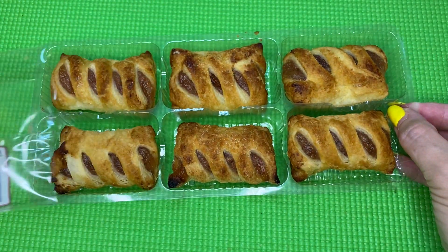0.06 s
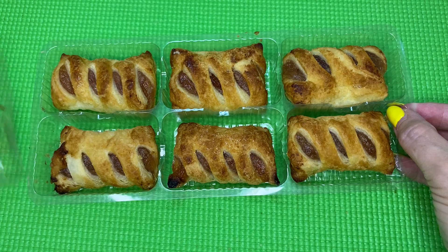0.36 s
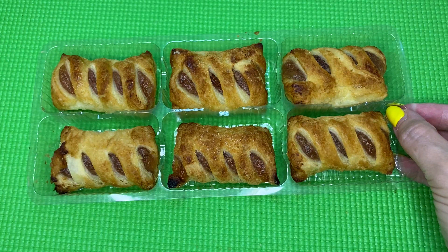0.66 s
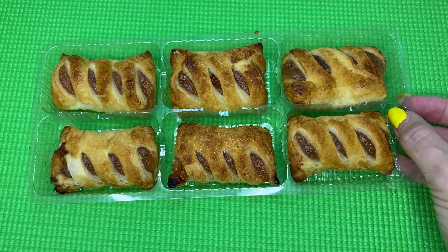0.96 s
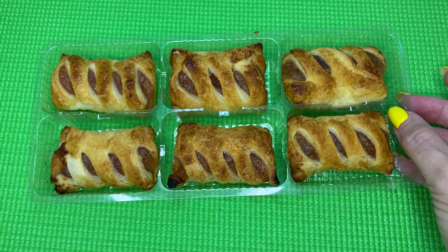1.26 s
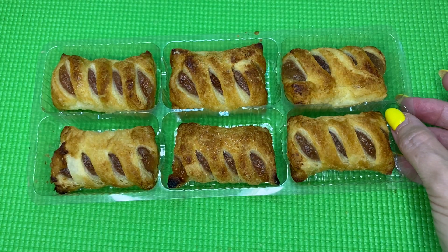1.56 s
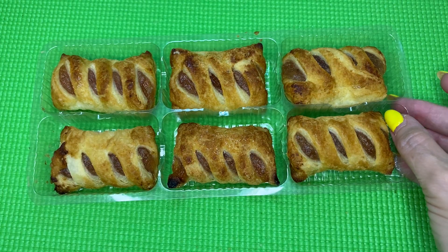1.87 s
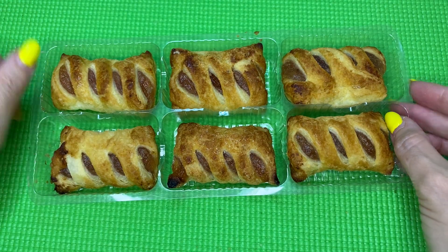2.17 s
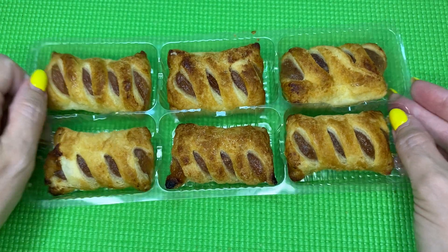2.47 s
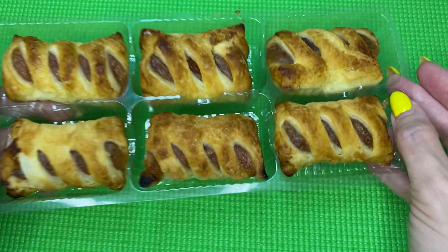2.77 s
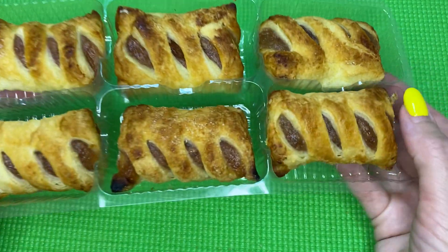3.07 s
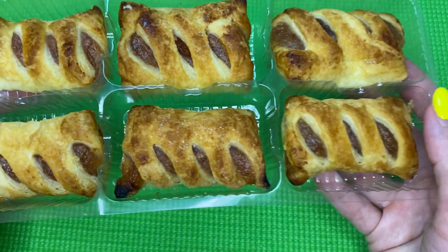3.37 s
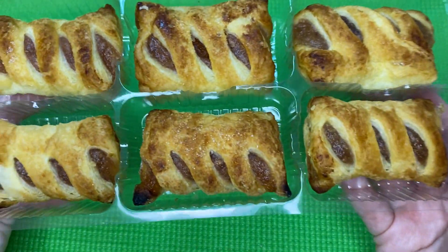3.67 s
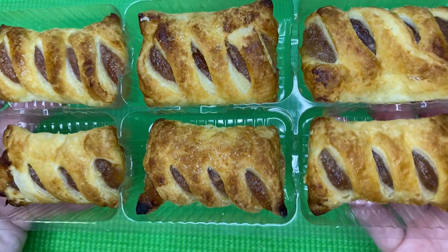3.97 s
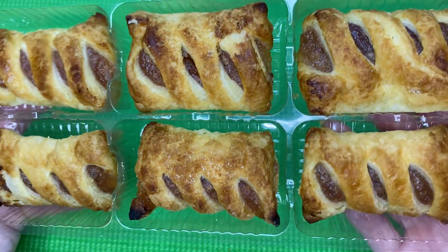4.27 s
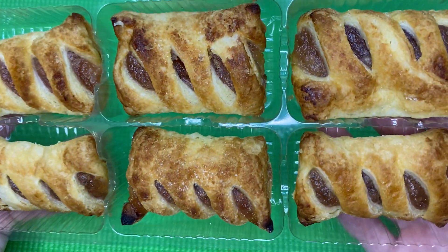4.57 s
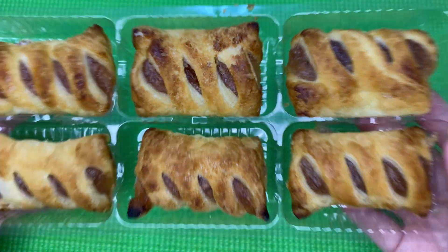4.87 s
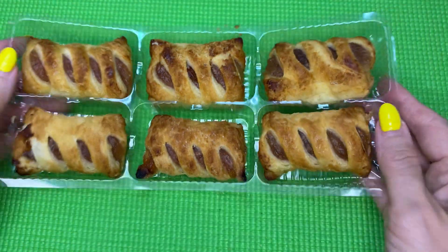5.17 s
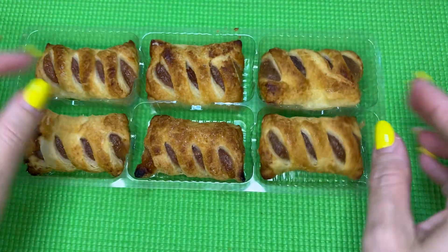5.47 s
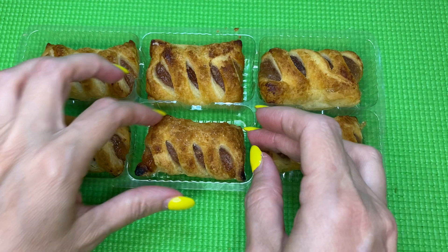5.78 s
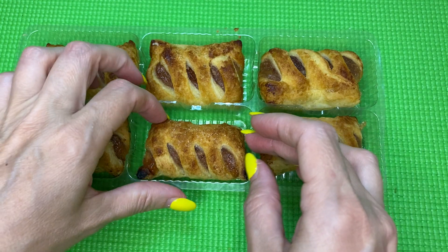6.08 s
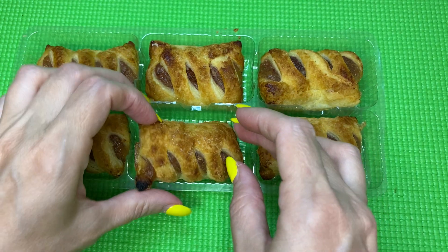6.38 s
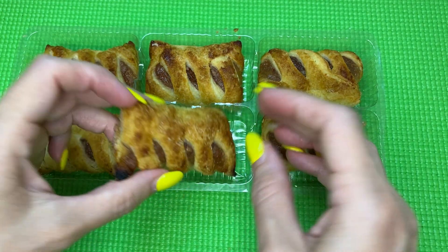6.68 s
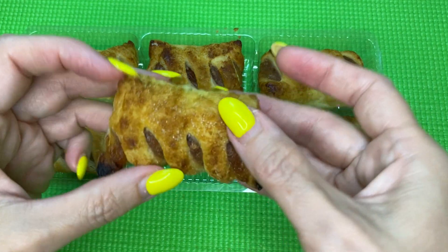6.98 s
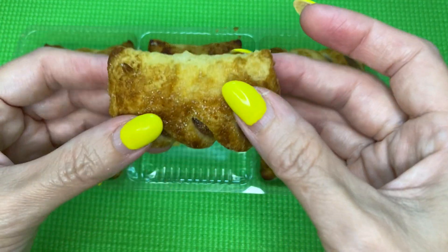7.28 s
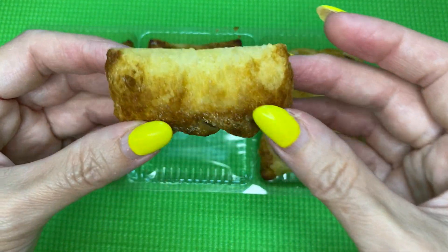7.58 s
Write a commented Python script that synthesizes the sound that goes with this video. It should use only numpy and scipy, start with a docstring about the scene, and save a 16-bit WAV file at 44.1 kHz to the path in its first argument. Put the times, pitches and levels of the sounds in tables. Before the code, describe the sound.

Thin plastic film crackles off to one side as it is pulled away. Close to the microphone, hands lift a plastic tray of pastries, its ribs snapping sharply and its walls buckling with hollow pops while skin rubs on the plastic. The tray lands on a mat with a soft thump, then a few light clicks and very faint ticks of dry crust follow. The small room hums faintly.

```python
"""A small, faintly humming room, one microphone close to a plastic tray of pastries on a soft mat.
Off to one side, thin film is drawn off and put aside, crackling as its creases flip over. Hands lift
the tray, whose ribs snap sharply and whose walls buckle with hollow pops, set it down with a thump
and pick out a pastry, its dry crust ticking. Skin and plastic rub between the snaps; a near wall
and the room answer each one."""
import sys
import numpy as np
from scipy import signal
from scipy.fft import rfft, irfft, next_fast_len
from scipy.io import wavfile
from scipy.ndimage import uniform_filter1d, map_coordinates

SR = 44100
rng = np.random.default_rng(int(sys.argv[2]) if len(sys.argv) > 2 else 0)


def dump(signal):
    """Clip the signal to [-1, 1] and save it as 16-bit WAV at the path in sys.argv[1]."""
    limited = np.clip(np.atleast_2d(signal).T, -1, 1)
    pcm = np.round(limited * 32767).astype(np.int16)
    wavfile.write(sys.argv[1], SR, pcm)


N = 341334

# Levels are relative, ahead of the mix. Sharpness, fizz and thud are levels over the panel's.
# Ribs and corners of the tray snapping, close to the microphone:
# (time [s], panel level [dB], panel pitch [Hz], sharpness [dB], fizz [dB], thud [dB])
RIB_SNAPS = [(2.3422, -27.5, 1450, 0.5, -9, -10), (2.4277, -26, 2204, 4, -3, -27),
             (2.4773, -29, 1480, -3, -18, -18), (2.54, -34, 2000, 4.5, 4, -23.5),
             (2.5505, -27.5, 1834, 2.5, 2, -13.5), (2.6397, -23.5, 1860, -7, -13.5, -34.5),
             (2.7859, -33.5, 1570, 7.5, 11, -14), (2.8295, -54, 1510, 13, 17, 3.5),
             (2.9103, -32.5, 1629, 1, -8.5, -6), (3.0526, -49, 1080, 2.5, -13, -9),
             (3.2057, -31.5, 1330, 2.5, -15, -4), (3.222, -34.5, 2400, -6, -29, -20),
             (3.2542, -37, 1622, 15, 1, 0.5), (3.2991, -38.5, 1344, 17, 10.5, -0.5),
             (3.301, -30.5, 1100, 6.5, 3.5, -0.5), (3.396, -45.5, 1280, 6, -17, -14),
             (4.4214, -60.5, 1150, -1.5, -9, -7.5), (4.8941, -25.5, 1390, .5, -6, -11),
             (5.1922, -22, 1543, 0, 1, -11), (5.2312, -37.5, 1346, -4.5, -13.5, -11.5),
             (5.3907, -33, 1505, .5, -14, -9.5), (5.4089, -48, 1120, 12, -2, -9),
             (5.4247, -49, 1840, 13, 10, -22), (5.4304, -49.5, 1400, 13, 14, -14),
             (5.4383, -39.5, 1330, 1, -5, -7), (5.4437, -37, 1440, -2, -8, -4.5),
             (5.503, -51.5, 1340, -2, 4, -5), (5.8687, -51, 3180, -4, -3.5, -12),
             (6.0106, -57.5, 1400, -7, -24, -2), (6.0595, -65, 1500, -0.5, 0, -13),
             (6.36, -65.5, 1500, 4, 2, -15), (6.2161, -63.5, 1520, 8, 0.5, 0),
             (6.4388, -55, 1160, 5.5, -15, -6)]
# Broad walls of the tray popping: (time [s], panel level [dB], panel pitch [Hz], thud [dB])
WALL_POPS = [(2.2935, -50.5, 1400, -10), (2.3282, -46.5, 1270, -5), (2.817, -37, 1150, -18),
             (2.8334, -30, 1250, -29), (2.8491, -28, 1470, -9.5), (2.8598, -28.5, 1632, -9),
             (2.8644, -28.5, 1220, -25), (2.8845, -30.5, 1250, -7), (2.9124, -31, 1183, -5.5),
             (2.9432, -31, 1320, -17), (3.0408, -31.5, 1046, -16.5), (3.4584, -30, 905, -17),
             (3.4688, -31, 1245, -14), (3.474, -39, 950, -3), (3.4842, -49, 1150, -10),
             (3.6179, -48.5, 1090, -7), (3.8752, -49, 830, -1), (3.9409, -46.5, 940, -7.5),
             (4.1392, -52, 1010, 2), (4.357, -57, 877, 0.5), (4.7653, -43.5, 810, -9.5),
             (4.777, -53, 800, -0.5), (4.8385, -46, 990, -6.5), (5.077, -32, 1330, -24),
             (5.1839, -37.5, 1500, -11)]
# Standing waves of the tray: (frequency [Hz], width [Hz], level against the plain response [dB])
TRAY_RESONANCES = [(600, 27, -3.5), (758, 32, -4), (1214.4, 9.6, -5), (1400, 30, -10), (2516, 570, -6),
                   (3120, 130, -6), (4600, 38, -4.5), (4950, 29, -4.5), (5950, 220, -6.5), (8660, 160, -9),
                   (9680, 160, -4), (12400, 160, -5), (12400, 210, -5)]
# Creases of the film flipping over, off to one side:
# (time [s], panel level [dB], panel pitch [Hz], sharpness [dB], fizz [dB])
FILM_CREASES = [(.082, -44, 2010, -5.5, -16), (.1358, -45, 1410, -1, -3.5), (.1589, -41, 2040, 0, -7),
                (.1855, -51, 1870, 2, 4), (.2079, -36, 1560, 0.5, 4.5), (.2183, -53, 1700, 3, 2),
                (.2298, -42.5, 1870, 1, -2), (.2327, -50.5, 1600, 8.5, 0), (.285, -42, 1680, 3, 5),
                (.2927, -39, 1470, -1, 0), (.4632, -40, 1750, -1, -6), (.4815, -45, 1500, -2.5, -17),
                (.5052, -50, 1240, -2, -8), (.5601, -56, 1600, 1, -7), (.6258, -36.5, 1840, -1, -10),
                (.6526, -44, 1070, -2.5, -11), (.7303, -57.5, 950, 0, -3), (.752, -47, 1500, 7.5, 4),
                (.8002, -57.5, 900, 1, -12), (.8881, -58.5, 1500, 6, -2), (.9078, -56.5, 990, 2, -6),
                (.9844, -52, 1600, -3.5, -23), (1.1236, -54, 1000, -10, -14),
                (1.288, -56.5, 1100, -2.5, -12), (1.3119, -56, 1150, -16, -20.5),
                (1.3618, -43.5, 1480, -3, -12.5), (1.3825, -39, 1500, 1.5, -2),
                (1.4059, -36.5, 1300, 0, 4.5), (1.4185, -34.5, 1600, 3.5, 6), (1.461, -35, 1250, 4, 5),
                (1.4895, -46, 1300, -5, -4), (1.5979, -54.5, 1100, -3, -7), (1.6458, -53.5, 1200, -15, -30),
                (1.7897, -49.5, 1700, 11, 9.5), (1.9562, -49.5, 1110, -17, 1)]
# Standing wave of the film: (frequency [Hz], width [Hz], level against the plain response [dB])
FILM_RESONANCES = [(1590, 71, -16)]
# Film and skin sliding over plastic and pastry: (start [s], length [s], scrape [dB], hiss [dB])
RUB_STROKES = [(.01, .13, -61, -54), (0.153, .15, -54.5, -46.5), (0.48, 0.05, -52, -68),
               (0.584, 0.29, -65, -70.5), (0.983, 0.16, -67, -66.5), (1.109, 0.21, -62.5, -62),
               (1.379, 0.13, -47, -60), (1.42, .03, -52, -46), (1.818, 0.059, -62.5, -61.5),
               (1.934, 0.028, -50.5, -52), (1.985, 0.14, -71, -66), (2.252, 0.086, -61.5, -54),
               (2.367, 0.37, -54.5, -52.5), (2.559, 0.055, -49, -43.5), (2.79, 0.083, -45.5, -45),
               (2.851, 0.043, -38.5, -53), (2.962, .13, -63.5, -60), (3.151, 0.082, -47.5, -49.5),
               (3.285, 0.055, -61, -43), (3.382, .08, -60.5, -55.5), (3.458, 0.046, -50, -46),
               (3.618, 0.23, -59.5, -54.5), (3.921, 0.077, -61.5, -60), (4.139, 0.006, -52.5, -54),
               (4.337, 0.16, -67.5, -68), (4.831, 0.076, -57.5, -48), (4.982, 0.351, -58.5, -46),
               (5.2, 0.062, -49, -48), (5.398, 0.032, -41, -33), (5.455, 0.095, -50, -55),
               (5.818, .035, -64, -57.5), (5.919, 0.04, -65, -57.5), (6.084, 0.059, -62, -58),
               (6.24, 0.02, -52, -48.5), (6.375, 0.11, -64, -61), (6.548, 0.062, -75, -59),
               (6.632, 0.018, -67, -53), (6.722, 0.041, -88, -70.5), (7.002, .13, -80.5, -71.5),
               (7.301, 0.13, -80, -73), (7.502, .1, -87, -69)]
# The contact catching, loose film more than fingers: (time [s], level against the sliding [dB])
CATCH_LEVELS = [(0, -4.5), (2.3, -1.5), (2.5, -15), (5.35, -16), (5.5, -7.5), (7.74, -11)]
# Thin walls scraping: (frequency [Hz], level [dB])
SCRAPE_SPECTRUM = [(30, -61), (100, -23), (250, -7), (400, -5), (580, -1), (850, -2), (1200, -3),
                   (2000, -10.5), (3200, -11.5), (8000, -36)]
# The rubbed surface hissing: (frequency [Hz], level [dB])
HISS_SPECTRUM = [(40, -58), (900, -25.5), (2000, -6.5), (2900, -4), (4400, -1.5), (6800, -4), (9500, -5.5),
                 (12600, -5), (14500, -12.5), (16000, -23.5)]
# The tray knocking and dropping onto the mat: (time [s], level [dB], pitch [Hz])
MAT_THUMPS = [(.725, -52, 200), (0.804, -51, 134), (.81, -51.5, 368), (1.18, -54, 318), (1.214, -49.5, 133),
              (1.294, -46.5, 130), (1.382, -41.5, 140), (1.42, -44.5, 165), (1.462, -42, 168),
              (3.297, -47.5, 133), (5.192, -53.5, 140), (5.41, -43, 215), (5.443, -35.5, 131),
              (5.448, -43.5, 240), (5.49, -44, 170)]
# The mat rumbling: (frequency [Hz], level [dB])
MAT_SPECTRUM = [(30, -44.5), (50, -22), (80, -6.5), (135, 5), (190, -1.5), (300, -4), (500, -11),
                (1200, -45.5)]
# Fingertips disturbing the crust: (time [s], level [dB])
CRUST_LEVELS = [(0, -110), (5.7, -110), (5.85, -85), (6.7, -68.5), (6.86, -91), (7.02, -76.5), (7.42, -76),
                (7.74, -83.5)]
# Dry flakes breaking: (frequency [Hz], level [dB])
FLAKE_SPECTRUM = [(40, -61), (1200, -25.5), (3000, -4.5), (7000, -3.5), (13000, 4), (16000, -8)]
# Decay of the room: (frequency [Hz], time to fall 60 dB [s])
ROOM_DECAY = [(200, 0.14), (1000, .38), (4000, 0.38), (9000, 0.29), (15000, 0.14)]
# Strength of the room's answer: (frequency [Hz], level [dB])
ROOM_SPECTRUM = [(200, 3.5), (1000, 1.5), (3000, -2), (14000, 5)]
# A faint low drone in the room: (time [s], pitch [Hz], level [dB])
ROOM_DRONE = [(0, 105.3, -71), (3.3, 99.9, -77), (4.15, 84, -67), (4.6, 88, -74.5), (5.7, 106.1, -72.5),
              (6.3, 104.7, -75.5), (7.15, 104.1, -68.5), (7.74, 110, -72)]
# Still air at the microphone: (frequency [Hz], level [dB])
AIR_SPECTRUM = [(25, -37.5), (37, -19), (47, 6.5), (70, 1.5), (110, -3), (200, -7.5), (500, -10),
                (1200, -11.5), (2500, -25.5), (7000, -25), (13000, -28.5), (16000, -38.5)]


def tray():
    """Close up, stiff ribs snap and broad walls pop; both ring the same tray."""
    typical_wall_hz, sharp_db_per_octave = 1200, 22
    walls = []
    for start, db, hz, thud_db in WALL_POPS:
        sharp_db = -14 + sharp_db_per_octave * np.log2(hz / typical_wall_hz)  # small walls pop sharper
        fizz_db = sharp_db - 14.5
        walls.append((start, db, hz, sharp_db, fizz_db, thud_db))
    ribs = snaps(RIB_SNAPS, flip_share=0.27, travel_s=0.000501, flutter_t60=0.019,
                 thud_octaves=0.6, panel_octaves=0.94, crease_octaves=1.1,
                 body_db=-12, fizz_hz=9400, echo_db=-19, room_db=-17)
    pops = snaps(walls, flip_share=0.31, travel_s=0.0005, flutter_t60=0.021,
                 thud_octaves=1.0, panel_octaves=0.9, crease_octaves=1.1,
                 body_db=-15, fizz_hz=9400, echo_db=-19.5, room_db=-17.5)
    return standing_waves(ribs + pops, TRAY_RESONANCES)


def film(scrape_db):
    """Loud creases among small random ones; off to one side, the film is heard with more room."""
    count, scatter_db = 14, 4
    typical_panel_hz, thud_db_per_octave = 1490, 12
    times = rng.uniform(0.046, 1.6, count)  # while the film is dragged
    drag_db = np.interp(times * SR, np.arange(N), scrape_db)
    levels = drag_db + 1 + scatter_db * rng.standard_normal(count)
    small_creases = [(start, db, typical_panel_hz, 2, -3) for start, db in zip(times, levels)]
    creases = []
    for start, db, hz, sharp_db, fizz_db in list(FILM_CREASES) + small_creases:
        thud_db = -9.5 + thud_db_per_octave * np.log2(typical_panel_hz / hz)  # low panels thud more
        creases.append((start, db, hz, sharp_db, fizz_db, thud_db))
    crackle = snaps(creases, flip_share=0.27, travel_s=0.000528, flutter_t60=0.023,
                    thud_octaves=1.23, panel_octaves=1.33, crease_octaves=1.27,
                    body_db=-8, fizz_hz=9200, echo_db=-14.5, room_db=-14)
    return standing_waves(crackle, FILM_RESONANCES)


def snaps(rows, flip_share, travel_s, flutter_t60, thud_octaves, panel_octaves, crease_octaves,
          body_db, fizz_hz, echo_db, room_db):
    """Each buckling is one sudden flip and a brief flutter of the sheet; both drive its resonances."""
    track, t = np.zeros(N), np.arange(SR // 16) / SR
    push = flip(len(t), travel_s)
    for start, db, panel_hz, sharp_db, fizz_db, thud_db in rows:
        crease_hz = 3534 * 2 ** (sharp_db / 43)  # a sharper crease rings higher
        flutter = rng.standard_normal((4, len(t))) * amp(-60 * t / flutter_t60)
        flutter /= np.linalg.norm(flutter, axis=1, keepdims=True)
        force = np.sqrt(1 - flip_share) * flutter + np.sqrt(flip_share) * push
        # The thud moves the whole sheet; panel, crease and fizz are ever smaller parts of it.
        snap = amp(db + thud_db) * resonate(force[0], hz=599.4, octaves=thud_octaves, order=2)
        snap += amp(db + thud_db + body_db) * resonate(force[0], hz=244, octaves=0.68, order=2)
        snap += amp(db) * resonate(force[1], panel_hz, panel_octaves, order=3)
        snap += amp(db + sharp_db) * resonate(force[2], crease_hz, crease_octaves, order=2)
        snap += amp(db + fizz_db) * resonate(force[3], fizz_hz, octaves=0.97, order=3)
        add(track, start, snap)
        # A near wall throws the snap back at the microphone, a little smeared; the room rings on.
        smear = rng.standard_normal(len(t)) * amp(-60 * t / 0.0046)
        echo = signal.fftconvolve(snap, smear / np.linalg.norm(smear))
        add(track, start + 0.0105, amp(echo_db) * echo)
        add(track, start, amp(room_db) * signal.fftconvolve(snap, room_tail(onset_s=0.015)))
    return track


def flip(size, travel_s):
    """One sudden push spread by bending waves: treble arrives first, 1 kHz after about travel_s."""
    hz = np.fft.rfftfreq(size, 1 / SR)
    return irfft(np.exp(-4j * np.pi * travel_s * np.sqrt(1000 * (hz + 100))), size)


def resonate(force, hz, octaves, order):
    """A heavily damped resonance, with the energy of 10 ms at rms 1."""
    edges = hz * 2 ** (np.array([-0.5, 0.5]) * octaves)
    edges = np.minimum(edges, [0.4 * SR, 0.48 * SR])
    ring = signal.lfilter(*signal.butter(order, edges, "band", fs=SR), force)
    return ring / np.linalg.norm(ring) * np.sqrt(SR / 100)


def standing_waves(sound, modes):
    """The sheet's narrow resonances stand out of the sound."""
    def response(f):
        return 1 + sum(amp(db) * 1j * f * width / (hz * hz - f * f + 1j * f * width)
                       for hz, width, db in modes)
    return filtered(sound, response)


def stroke_levels():
    """Scrape and hiss in dB: strokes swell, hold and die away under a wavering hand pressure."""
    attack_s, release_s, tail_s, tail_db = 0.013, 0.012, 0.081, -14
    t, power = np.arange(N) / SR, np.zeros((2, N))
    for start, length, scrape_db, hiss_db in RUB_STROKES:
        span = slice(max(int((start - 0.1) * SR), 0), int((start + length + 0.3) * SR))
        before = np.maximum(start - t[span], 0)
        after = np.maximum(t[span] - start - length, 0)
        swell = np.exp(-before / attack_s)
        fade = np.maximum(np.exp(-after / release_s), amp(tail_db) * np.exp(-after / tail_s))
        power[:, span] += (amp([[scrape_db], [hiss_db]]) * swell * fade) ** 2
    power[0] += amp(-75.5) ** 2  # resting hands still scrape a little
    pressure_db = 2.17 * wobble(per_second=22)
    return 10 * np.log10(power + 1e-14) + pressure_db


def rubbing(scrape_db, hiss_db):
    """Sliding makes the surface hiss and the thin walls scrape; now and then the contact catches."""
    catch_db, = curves(CATCH_LEVELS)
    force = wandering_contact(rng.standard_normal(N), depth_db=2)
    force += amp(catch_db) * slips(per_second=49, spread_db=5.5, t60=0.035)
    scrape = amp(scrape_db) * coloured(force, SCRAPE_SPECTRUM)
    hiss = amp(hiss_db) * coloured(force, HISS_SPECTRUM)
    return scrape + hiss


def wandering_contact(rub, depth_db):
    """The colour of a rub shifts as the contact wanders over the surface."""
    spectra = signal.stft(rub, nperseg=512)[2]
    patches = uniform_filter1d(rng.standard_normal(spectra.shape), size=6, axis=0)  # across pitch
    patches = uniform_filter1d(patches, size=11, axis=1)  # across time
    return signal.istft(spectra * amp(depth_db * unit(patches)), nperseg=512)[1][:N]


def slips(per_second, spread_db, t60):
    """Tiny slips of uneven size, each a very short burst; the whole at rms 1."""
    happens = rng.random(N) < per_second / SR
    sizes = amp(spread_db * np.minimum(rng.standard_exponential(N), 3))
    bursts = signal.lfilter([1], [1, -amp(-60 / (t60 * SR))], happens * sizes)
    return unit(bursts * rng.standard_normal(N))


def mat(scrape_db):
    """The soft mat passes only the lows: a rumble with the scraping, a thump with each knock."""
    rumble_db = -64 + 0.26 * (scrape_db + 50)
    track = amp(rumble_db) * coloured(rng.standard_normal(N), MAT_SPECTRUM)
    t = np.arange(SR // 4) / SR
    attack_s, t60 = 0.003, 0.071
    envelope = (1 - np.exp(-t / attack_s)) * amp(5.5 - 60 * t / t60)
    for start, db, hz in MAT_THUMPS:
        add(track, start, amp(db) * envelope * np.sin(2 * np.pi * hz * t))
    return track


def crust():
    """Dry flakes of pastry give way in tiny, bright ticks."""
    level_db, = curves(CRUST_LEVELS)
    return amp(level_db) * coloured(slips(per_second=41, spread_db=3, t60=0.013), FLAKE_SPECTRUM)


def room_tail(onset_s):
    """The small room's diffuse answer, of energy 1, building up over about onset_s."""
    hz, t, spectra = signal.stft(rng.standard_normal(SR // 3), SR, nperseg=256)
    decay = amp(along(ROOM_SPECTRUM, hz)[:, None] - 60 * t / along(ROOM_DECAY, hz)[:, None])
    build_up = 1 - np.exp(-(t / onset_s) ** 3)
    tail = signal.istft(spectra * decay * build_up, SR, nperseg=256)[1]
    return tail / np.linalg.norm(tail)


def room_tone():
    """Behind everything, still air and a low drone that wavers."""
    drone_hz, drone_db = curves(ROOM_DRONE)
    phase = 2 * np.pi * np.cumsum(drone_hz) / SR + wobble(per_second=9.3)
    drone = amp(drone_db + 3.5 * wobble(per_second=13)) * unit(np.sin(phase))
    air = amp(-68.5) * coloured(rng.standard_normal(N), AIR_SPECTRUM)
    return drone + air


def amp(db):
    """Decibels to gain."""
    return 10 ** (np.asarray(db) / 20)


def unit(x):
    """x at rms 1."""
    return x / np.sqrt(np.mean(x ** 2) + 1e-20)


def along(points, hz):
    """Read (frequency [Hz], value) points at hz, on a log axis."""
    frequencies, values = np.transpose(points)
    return np.interp(np.log(hz + 1), np.log(frequencies + 1), values)


def curves(rows):
    """One value per sample for each column after the time."""
    times, *columns = np.transpose(rows)
    return [np.interp(np.arange(N) / SR, times, column) for column in columns]


def wobble(per_second):
    """A smooth curve through evenly spaced random knots."""
    knots = rng.standard_normal(int(N * per_second / SR) + 4)
    return map_coordinates(knots, [np.arange(N) * per_second / SR])


def filtered(x, response):
    """x through a frequency response."""
    size = next_fast_len(N + SR // 2)
    return irfft(rfft(x, size) * response(np.fft.rfftfreq(size, 1 / SR)), size)[..., :N]


def coloured(x, spectrum):
    """x with a spectrum imposed, at rms 1."""
    return unit(filtered(x, lambda hz: amp(along(spectrum, hz))))


def add(track, start_s, sound):
    """Mix a sound into a track from start_s on."""
    first = max(round(start_s * SR), 0)
    part = track[first:first + len(sound)]
    part += sound[:len(part)]


def scene():
    """At the microphone, in mono: the same strokes drive rubbing, small creases and the mat's rumble."""
    scrape_db, hiss_db = stroke_levels()
    handling = amp(-2) * rubbing(scrape_db, hiss_db) + crust() + mat(scrape_db)
    return (handling + room_tone() + amp(-0.45) * tray() + amp(0.5) * film(scrape_db))[None]


def record(dry):
    """The recorder rounds off the tallest spikes and keeps nothing above its band limit."""
    ceiling, band_limit_hz = 0.66, 16300
    rounded = dry / (1 + (dry / ceiling) ** 6) ** (1 / 6)
    return filtered(rounded, lambda hz: 1 / np.sqrt(1 + (hz / band_limit_hz) ** 140))


dry = scene()
out = record(dry)
dump(out)
```